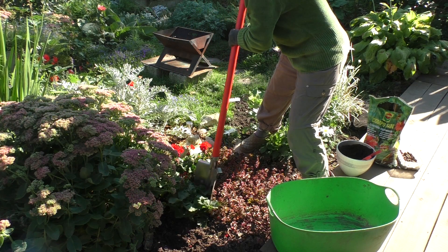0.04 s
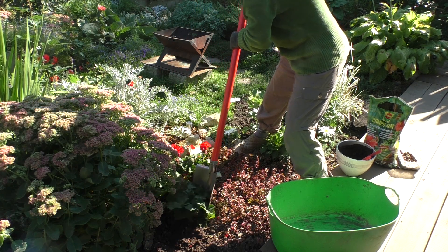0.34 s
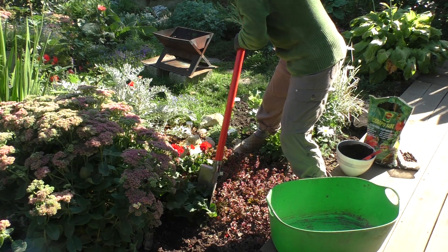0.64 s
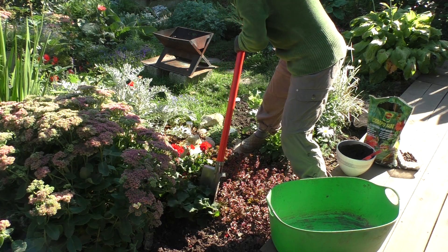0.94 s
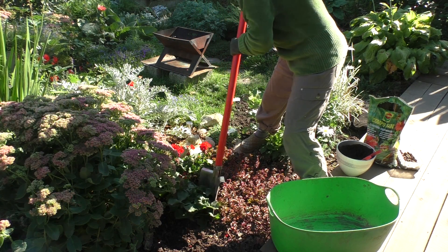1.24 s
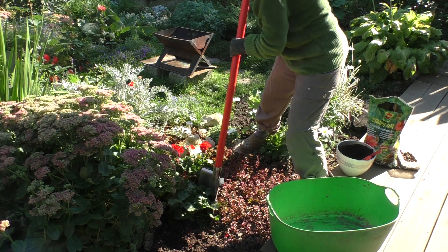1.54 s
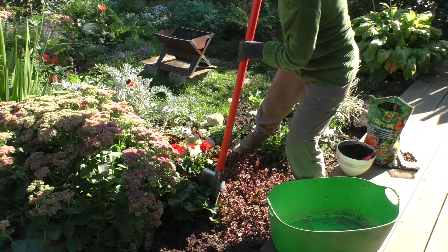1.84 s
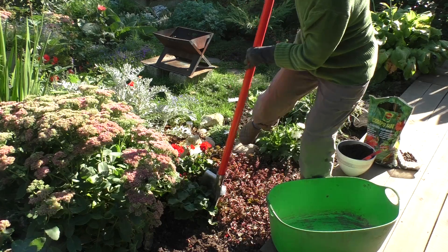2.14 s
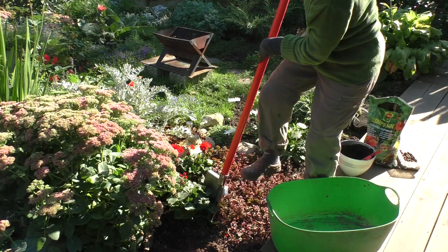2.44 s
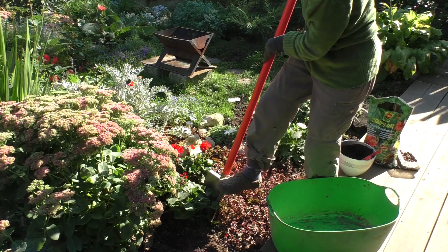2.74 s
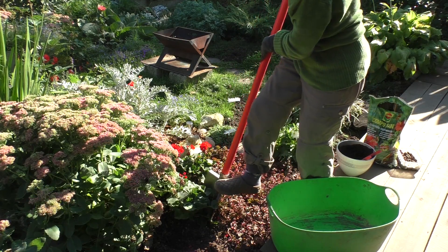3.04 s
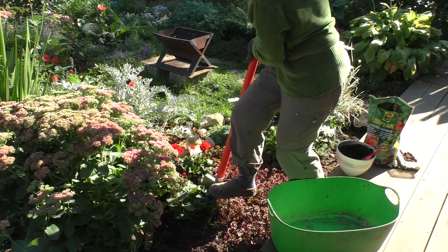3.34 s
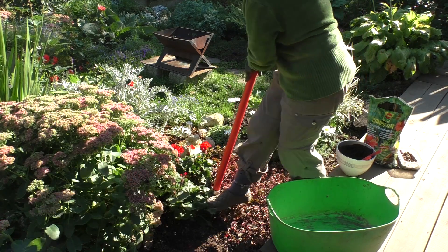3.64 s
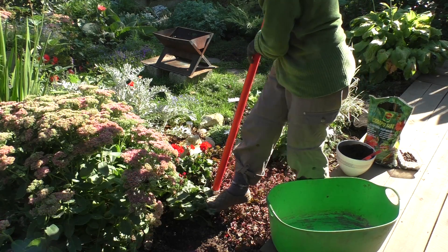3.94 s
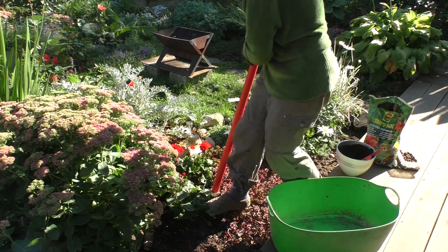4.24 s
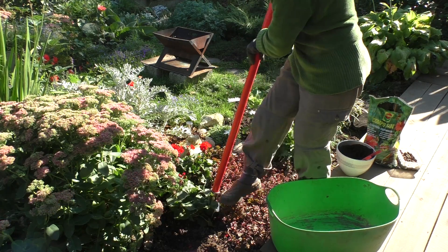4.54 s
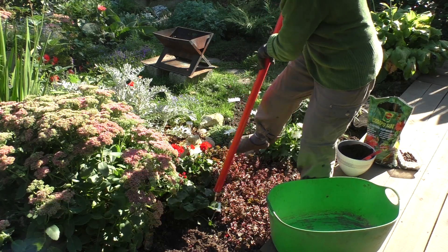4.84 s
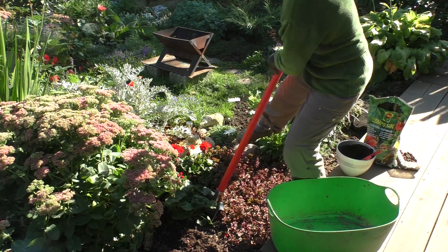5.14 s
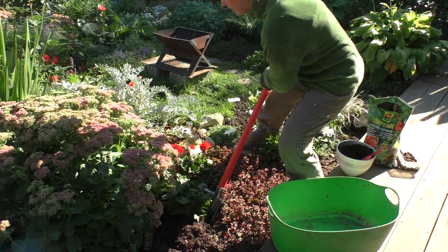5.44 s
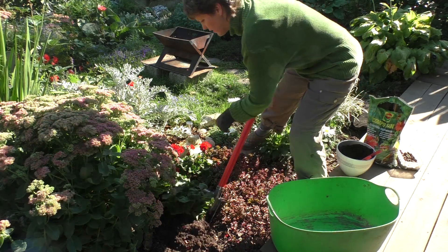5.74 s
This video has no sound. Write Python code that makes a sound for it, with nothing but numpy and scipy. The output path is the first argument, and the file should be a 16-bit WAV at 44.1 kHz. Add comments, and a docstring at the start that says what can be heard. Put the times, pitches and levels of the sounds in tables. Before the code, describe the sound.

In a garden, close to the microphone, leaves brush softly and stems snap while a breeze rumbles low. A spade's edge clinks once. A little past halfway the blade is trodden into gritty soil with a short rasp and a cluster of stony knocks. A smaller scrape, another dry clink, dull earthy scuffs and more rustling follow. Faint birds whistle far off in a steady outdoor hiss.

```python
"""A spade is trodden into a garden bed, close to the microphone: the blade rasps through gritty soil,
stones knock on the steel, and twice the bare edge clinks. Around it leaves brush against legs and
shaft, stalks tick, stems snap, clods land and a sole scuffs; deck and house wall answer faintly.
A breeze rumbles in the microphone housing; far birds whistle and twitter in the garden's hiss."""
import sys
import numpy as np
from scipy import signal
from scipy.fft import rfft, irfft, next_fast_len
from scipy.io import wavfile
from scipy.ndimage import uniform_filter1d, map_coordinates

SR = 44100
rng = np.random.default_rng(int(sys.argv[2]) if len(sys.argv) > 2 else 0)


def wav_record(signal):
    """Record a signal, one row per channel, as 16-bit PCM in the file named by sys.argv[1]."""
    frames = np.transpose(np.atleast_2d(signal))
    bounded = np.clip(frames, -1, 1)
    # unit amplitude maps onto the largest positive 16-bit level
    quanta = np.round(bounded * 32767).astype(np.int16)
    wavfile.write(sys.argv[1], SR, quanta)


N = 264600  # 6 s

# open-air hiss all around: (frequency [Hz], relative density [dB])
HISS_SPECTRUM = [(30, 4), (60, 20), (200, -2), (450, -10), (630, -7.5), (720, 2), (850, 2.5), (1150, 2),
                 (1900, -4.5), (2200, -3.5), (2450, 2), (3700, 0), (4300, -5.5), (5100, 1), (5900, -7.5),
                 (10500, -7.5), (12500, -11), (16000, -15.5)]
# far birds, held notes: (start [s], length [s], pitch [Hz], relative level [dB])
BIRD_WHISTLES = [(.02, .23, 3960, -63), (.82, .21, 3900, -63), (.86, .25, 2340, -65),
                 (4.36, 1.05, 3995, -63.5), (4.79, .13, 3985, -60), (5.03, .09, 2990, -62),
                 (5.69, .14, 2960, -54.5), (5.87, .09, 3920, -61)]
# far birds, short glides: (start [s], first pitch [Hz], last pitch [Hz], relative level [dB])
BIRD_CHIRPS = [(.625, 4560, 4360, -61), (.675, 4020, 3700, -62), (1.015, 3780, 4330, -58)]
# far birds, runs of quick notes: (start [s], notes [count], pitch [Hz], relative level [dB])
BIRD_TWITTERS = [(.42, 11, 2700, -63), (4.38, 5, 2950, -66), (5.18, 7, 3100, -65)]
# echo off deck and house wall: (frequency [Hz], t60 [s])
YARD_DECAY = [(300, 0.34), (3000, 0.14), (12000, 0.13)]
# breeze on the microphone, deep rumble: (time [s], level [dB])
WIND_DEEP = [(0, -29), (.28, -34), (.72, -34), (.84, -26), (.95, -27), (1.13, -22), (1.6, -19.5),
             (1.93, -27.5), (2.27, -26.5), (2.35, -22), (2.43, -30.5), (3.15, -31), (3.34, -28.5),
             (3.48, -32), (3.62, -28.5), (4.15, -34.5), (4.55, -34), (4.9, -31), (5.22, -36), (5.38, -31),
             (5.85, -27.5), (6, -30)]
# breeze on the microphone, upper resonances: (time [s], level [dB])
WIND_UPPER = [(0, -33.5), (.2, -39.5), (.5, -38), (.95, -35.5), (1.18, -24.5), (1.5, -25), (1.68, -28.5),
              (1.9, -27), (2.2, -36), (2.48, -40.5), (2.68, -30), (2.95, -33.5), (3.25, -32), (3.75, -35.5),
              (4.02, -36.5), (4.15, -42.5), (4.47, -45.5), (4.65, -41), (5.4, -36), (6, -33.5)]
# hollow resonances of the microphone housing: (frequency [Hz], width [Hz], relative level [dB])
HOUSING_MODES = [(115.2, 33, -5), (146.1, 42.8, 0.5), (181.6, 13, 6.5), (196.5, 11.5, 1.5), (242, 35.5, -5),
                 (290, 29, -2.5), (323.05, 10.2, 2), (342.3, 15.7, -2), (379, 12.2, -12.5),
                 (423.8, 46, -15.5), (474.3, 84, -17.5)]
# leaves rubbing: (frequency [Hz], gain [dB])
LEAF_SPECTRUM = [(500, -13), (900, -4.5), (1900, -1), (2700, 4.5), (3600, 5.5), (4300, 1.5), (5200, 6.5),
                 (6200, 2), (9000, -2), (11500, -7), (16000, -28)]
# soft rustle of the stirred plants: (time [s], relative level [dB])
RUSTLE_LEVEL = [(0, -62), (.25, -52), (.85, -59), (1.45, -64), (1.75, -54), (2.15, -60.5), (2.38, -52),
                (3.05, -58.5), (3.351, -51.5), (3.9, -61), (5.0, -59), (5.4, -53), (6.0, -54)]
# foliage brushing past: (time [s], relative level [dB], half length [s], tilt [dB/octave])
LEAF_SWISHES = [(0.254, -42, 0.013, -2), (0.318, -47.5, 0.016, 1), (0.805, -51, 0.016, 3),
                (0.845, -49.5, 0.037, -0.5), (1.091, -46, 0.012, -2.5), (1.242, -49.5, 0.03, 4),
                (1.309, -43.5, 0.02, 6), (1.642, -48.5, 0.023, -3), (1.99, -47.5, 0.037, 1.5),
                (2.469, -51, 0.041, -7.5), (4.215, -48.5, 0.01, 13), (5.231, -51, 0.022, -1),
                (5.673, -46.5, 0.095, 9.5)]
# a dry stalk's tick: (frequency [Hz], gain [dB])
STALK_SPECTRUM = [(1000, -24), (2200, -7), (3400, 11), (5300, 4), (7000, -25), (14000, -37)]
# a leg swings through dry stalks: (time [s], peak [dB])
STALK_TICKS = [(1.651, -51), (2.4267, -36), (2.449, -34), (2.452, -33), (2.4604, -39), (2.476, -34.5),
               (2.491, -40)]
# a stem's crack: (frequency [Hz], gain [dB])
STEM_SPECTRUM = [(500, -12), (1000, -5), (2000, -1), (3000, -4), (4200, -5), (4950, -4), (5900, -2.5),
                 (7100, 0), (9000, -4), (11500, -2), (16000, -12)]
# stems snapping: (time [s], relative peak [dB], pitch [Hz])
STEM_SNAPS = [(0.1235, -36.5, 5770), (.202, -32, 11100), (1.2295, -37, 7000), (1.3154, -35, 6400),
              (1.8397, -24.5, 11200), (2.7523, -37, 6940), (3.6268, -34, 5900)]
# a dull earthy tick or scuff: (frequency [Hz], gain [dB])
EARTH_SPECTRUM = [(400, 3), (650, -9), (800, -2.5), (1150, 2.5), (1600, -6), (3000, -10), (6000, -33),
                  (14000, -25)]
# clods landing, a sole shifting on the soil: (time [s], relative peak [dB], t60 [s])
EARTH_TICKS_AND_SCUFFS = [(0.341, -49, .04), (1.086, -44, 0.088), (2.495, -44, .07), (3.397, -23, 0.0083),
                          (3.682, -43.5, 0.19), (3.77, -44, 0.11), (4.244, -37, 0.053), (4.256, -36, 0.085),
                          (5.447, -38.5, 0.088), (5.535, -36, 0.06), (5.884, -40, 0.041)]
# grit against steel: (frequency [Hz], gain [dB])
GRIT_SPECTRUM = [(400, -12), (650, -32), (800, 3.5), (1400, -8.5), (2100, 0), (2650, 3.5), (4100, 1.5),
                 (5100, 2), (8000, 4.5), (10300, 0.5), (11300, -5), (12500, -6), (16000, -6)]
# the blade's bare edge: (frequency [Hz], width [Hz], relative level [dB])
EDGE_MODES = [(3200, 240, -27), (4280, 380, -17), (4900, 160, -5.5), (5370, 110, -14), (6940, 260, 0),
              (7800, 300, -22), (8820, 450, -2), (10200, 460, -14), (10730, 320, -8), (12400, 400, -14)]
# the edge meets a stone as the spade is levered:
# (time [s], peak [dB], favoured frequency [Hz], rebound gain [dB], crack tilt [dB/octave])
EDGE_CLINKS = [(1.29, -28, 4800, 2.5, -1.5), (5.0156, -22, 7100, -2, 4.5)]
# the steel blade, damped by earth: (frequency [Hz], width [Hz], relative level [dB])
BLADE_MODES = [(874, 62, -10), (1680, 200, -20), (2854, 180, 3.5), (3700, 150, -1), (4750, 340, -1),
               (5500, 310, 0), (6680, 440, -6.5), (8600, 390, -17), (9350, 400, -2), (10950, 470, 3.5),
               (14200, 350, -18)]
# stones meeting the buried blade: (time [s], peak [dB], favoured frequency [Hz])
STONE_KNOCKS = [(3.3682, -33.5, 3460), (3.4035, -28.5, 3020), (3.417, -30, 2850), (3.4353, -35, 5000),
                (3.4417, -29, 4800), (3.4555, -33, 3600), (3.48, -38, 2800), (3.4864, -24.5, 5840),
                (3.4895, -27.5, 2800), (3.4967, -29, 9300), (3.5135, -32, 2870), (3.5297, -29, 3650),
                (3.5308, -16.5, 2830), (3.545, -29, 4750), (3.5493, -22.5, 7500), (3.5559, -27, 3020),
                (4.2295, -31.5, 6500), (4.24, -48, 5000), (4.2585, -51, 3000)]
# wet stalks squeaking on the steel: (time [s], half length [s], pitch [Hz], level [dB])
STALK_SQUEAKS = [(3.385, 0.0055, 5450, -35.5)]
# shoves that tread the blade into the soil: (start [s], length [s], level [dB])
BLADE_SHOVES = [(3.374, 0.17, -35), (3.43, 0.063, -44.5), (3.462, 0.012, -44), (4.219, 0.059, -46)]


def amp(db):
    """Decibels to gain."""
    return 10 ** (np.asarray(db) / 20)


def unit(x):
    """Scale to rms 1."""
    return x / np.sqrt(np.mean(x ** 2) + 1e-20)


def even(x, span_s=.14):
    """Keep the quick flutter but hold the strength over longer spans, at rms 1."""
    power = np.abs(uniform_filter1d(x * x, int(span_s * SR)))
    return unit(x / np.sqrt(power + 1e-12))


def peaked(x, db):
    """Scale a hit so that its loudest millisecond is at db."""
    return amp(db) * x / np.sqrt(uniform_filter1d(x * x, SR // 1000).max())


def clock(size=N):
    """Seconds, sample by sample."""
    return np.arange(size) / SR


def add(track, s, sound):
    """Mix a sound in at s seconds."""
    part = track[max(round(s * SR), 0):][:len(sound)]
    part += sound[:len(part)]


def along(points, hz):
    """Read (frequency [Hz], value) points on a log axis."""
    f, v = np.transpose(points)
    return np.interp(np.log(hz + 1), np.log(f + 1), v)


def bell(x, centre, half):
    """A bell-shaped rise and fall around a centre."""
    return np.exp(-.5 * ((x - centre) / half) ** 2)


def wobble(rate):
    """A smooth random curve, rate knots a second."""
    return map_coordinates(rng.standard_normal(int(N * rate / SR) + 4), [clock() * rate])


def filtered(x, response):
    """Filter x by a complex response of frequency."""
    m = next_fast_len(len(x) + SR // 8)
    return irfft(rfft(x, m) * response(np.fft.rfftfreq(m, 1 / SR)), m)[:len(x)]


def coloured(x, spectrum, tilt_db=0):
    """Shape x by a spectrum and a tilt per octave, rolled off below the first point, at rms 1."""
    def response(hz):
        lowest = spectrum[0][0]
        db = along(spectrum, hz) + tilt_db * np.log2(np.maximum(hz, lowest))
        return amp(db) * np.minimum(hz / lowest, 1) ** 4
    return unit(filtered(x, response))


def resonate(x, modes):
    """Pass x through damped resonances (frequency [Hz], width [Hz], level [dB]), at rms 1."""
    def response(f):
        return sum(amp(db) * 1j * f * width / (hz * hz - f * f + 1j * f * width)
                   for hz, width, db in modes)
    return unit(filtered(x, response))


def burst(t60):
    """A tenth of a second of noise that starts at once and dies away."""
    t = clock(SR // 10)
    return rng.standard_normal(len(t)) * amp(-60 * t / t60)


def grains(size, rate, spread_db):
    """Tiny impacts at random moments, a few larger than the rest, at rms 1."""
    sizes = amp(spread_db * np.minimum(rng.exponential(size=size), 4))
    return unit((rng.random(size) < rate / SR) * sizes * rng.standard_normal(size))


def pings(size, rate, spectrum, cycles, spread_db):
    """Grains that each ring briefly at a pitch of their own, at rms 1."""
    count = int(rate * size / SR) + 1
    when, pitch, chance, phase = rng.random((count, 4)).T[:, :, None]
    hz = 900 + 14500 * pitch
    t = clock(size=128)
    sizes = amp(-spread_db * np.log(.02 + chance)) * np.sqrt(hz)
    waves = sizes * np.exp(-t * hz / cycles) * np.sin(2 * np.pi * (hz * t + phase))
    places = (when * size).astype(int) + np.arange(len(t))
    return coloured(np.bincount(places.ravel(), waves.ravel(), size)[:size], spectrum)


def garden_hiss(level_db=-54):
    """The even hiss of the open air all around, drifting slightly."""
    drift = amp(.3 * wobble(3))
    return amp(level_db) * drift * coloured(rng.standard_normal(N), HISS_SPECTRUM)


def far_birds(waver_hz=48, sag_hz=34.8, chirp_s=.075, note_s=.036, spread_hz=280):
    """Sinking whistles, chirps and twitters, blurred by echoes on their long way to the microphone."""
    song = np.zeros(N)
    waver = waver_hz * wobble(400)
    held = [(s, length, hz, hz - sag_hz, db) for s, length, hz, db in BIRD_WHISTLES]
    glides = [(s, chirp_s, first, last, db) for s, first, last, db in BIRD_CHIRPS]
    quick = [(s + k * note_s, note_s, *(hz + spread_hz * rng.uniform(-1.1, 1, 2)), db)
             for s, notes, hz, db in BIRD_TWITTERS for k in range(notes)]
    for s, length, first, last, db in held + glides + quick:
        n = int(length * SR)
        phase = 2 * np.pi * np.cumsum(np.linspace(first, last, n) + waver[:n]) / SR
        add(song, s, amp(db) * unit(np.sin(phase) * signal.windows.tukey(n, .5)))
    tail = burst(t60=.15)
    echoes = signal.fftconvolve(song, tail / np.linalg.norm(tail))[:N]
    fading = amp(1.2 * wobble(22))
    return .55 * fading * (song + echoes)


def yard_echo(x):
    """Deck and house wall give a short answer whose treble dies first."""
    hz, t, noise = signal.stft(rng.standard_normal(SR // 4), SR, nperseg=256)
    decay = amp(-60 * t / along(YARD_DECAY, hz)[:, None])
    tail = signal.istft(noise * decay, SR, nperseg=256)[1]
    return signal.fftconvolve(x, tail / np.linalg.norm(tail))[:N]


def wind_on_microphone(bottom_hz=95, split_hz=245, top_hz=505):
    """Turbulence drones in the housing; the deep and the upper resonances swell separately."""
    hollow = np.zeros(N)
    for hz, width, db in HOUSING_MODES:
        band = resonate(rng.standard_normal(N), [(hz, width, 0)])
        steeper = resonate(band, [(hz, 2 * width, 0)])
        hollow += amp(db) * np.sqrt(width) * even(steeper)
    drone = filtered(hollow, lambda hz: 1 / (1 + (hz / top_hz) ** 14) / (1 + (bottom_hz / (hz + 1)) ** 4))
    deep = filtered(drone, lambda hz: 1 / (1 + (hz / split_hz) ** 16))
    deep_db = np.interp(clock(), *np.transpose(WIND_DEEP))
    upper_db = np.interp(clock(), *np.transpose(WIND_UPPER))
    return amp(deep_db) * unit(deep) + amp(upper_db) * unit(drone - deep)


def leaves(size, tilt_db, crackle_db=-2):
    """Leaves rubbing: dense little scratches with sparser crackles on top, at rms 1."""
    rub = coloured(grains(size, rate=9000, spread_db=2), LEAF_SPECTRUM, tilt_db)
    crackle = pings(size, rate=950, spectrum=LEAF_SPECTRUM, cycles=52, spread_db=3)
    return unit(rub + amp(crackle_db) * crackle)


def foliage(gain_db=-1, flutter_db=.57, restless_db=1.94):
    """The plants around the spade rustle softly; each brush against them is one swell."""
    rustle_db = np.interp(clock(), *np.transpose(RUSTLE_LEVEL)) - restless_db * wobble(16)
    out = amp(rustle_db) * leaves(N, tilt_db=.5)
    for s, db, half, tilt_db in LEAF_SWISHES:
        start = max(s - 2.5 * half, 0)
        t = start + clock(int(5 * half * SR))
        add(out, start, amp(db) * bell(t, s, half) * leaves(len(t), tilt_db))
    return out * amp(gain_db + flutter_db * wobble(90))


def stalk_ticks():
    """Dry stalks tick as they are bent aside."""
    out = np.zeros(N)
    for s, db in STALK_TICKS:
        add(out, s, peaked(coloured(burst(t60=.003), STALK_SPECTRUM), db))
    return out


def stem_snaps(gain_db=-6, ring_db=-4, width_hz=1900):
    """A stem tears in a few milliseconds and rings; the higher its pitch, the brighter its crack."""
    out = np.zeros(N)
    for s, db, hz in STEM_SNAPS:
        crack = coloured(burst(t60=.018), STEM_SPECTRUM, tilt_db=3 * np.log2(hz / 6000))
        ring = amp(ring_db) * resonate(crack, [(hz, width_hz, 0)])
        add(out, s, peaked(crack + ring, db + gain_db))
    return out


def loose_earth(gain_db=-7):
    """Dull earthy ticks and scuffs: clods landing, a sole shifting on the soil."""
    out = np.zeros(N)
    for s, db, t60 in EARTH_TICKS_AND_SCUFFS:
        add(out, s, peaked(coloured(burst(t60), EARTH_SPECTRUM), db + gain_db))
    return out


def strike(modes, focus_hz, focus_db, contact_s, crack_db, tilt_db):
    """Steel on stone: modes are driven while the stone grinds, then die; the contact point favours some."""
    t = clock(SR // 10)
    since_release = np.maximum(t - contact_s, 0)
    ring = np.zeros(len(t))
    for hz, width, db in modes:
        level = db + focus_db * bell(np.log2(hz), np.log2(focus_hz), .2) + rng.normal(0, 1)
        phase = rng.uniform(0, 2 * np.pi) + np.cumsum(rng.normal(0, .06, len(t)))
        ring += amp(level) * np.exp(-np.pi * width * since_release) * np.sin(2 * np.pi * hz * t + phase)
    crack = coloured(burst(t60=.017), GRIT_SPECTRUM, tilt_db)
    attack = 1 - np.exp(-(t / .0002) ** 2)
    return attack * (peaked(ring, 0) + peaked(crack, crack_db))


def edge_clinks(rebound_s=.002):
    """The bare edge hits a stone and rebounds: two hits heard as one dry tick."""
    out = np.zeros(N)
    for s, db, hz, rebound_db, tilt_db in EDGE_CLINKS:
        for delay, level in ((0, db), (rebound_s, db + rebound_db)):
            hit = strike(EDGE_MODES, hz, focus_db=4, contact_s=.0007, crack_db=-5, tilt_db=tilt_db)
            add(out, s + delay, peaked(hit, level))
    return out


def stone_knocks():
    """Stones knock on the buried blade."""
    out = np.zeros(N)
    for s, db, hz in STONE_KNOCKS:
        hit = strike(BLADE_MODES, hz, focus_db=9.5, contact_s=.0016, crack_db=-3.5, tilt_db=.5)
        add(out, s, peaked(hit, db))
    return out


def spade_in_soil(ring_db=-5.5, contact_hz=11800, bite_s=.018, stop_s=.015):
    """Close up, grit rasps along the blade in small slips, and wet stalks squeak against it."""
    steel = resonate(grains(N, rate=3500, spread_db=2.1), BLADE_MODES)
    # a film of earth softens every contact with the steel
    steel = filtered(steel, lambda hz: 1 / (1 + (hz / contact_hz) ** 8))
    grit = pings(N, rate=9000, spectrum=GRIT_SPECTRUM, cycles=7.6, spread_db=2)
    rasp = unit(grit + amp(ring_db) * unit(steel))
    t = clock()
    force = np.zeros(N)
    for s, length, db in BLADE_SHOVES:
        speeding_up = np.clip((t - s) / bite_s, 0, 1)
        stopping = np.exp(-np.maximum(t - s - length, 0) / stop_s)
        force += amp(db) * speeding_up * stopping
    judder = amp(1.1 * wobble(140))
    out = judder * force * rasp
    for s, half, hz, db in STALK_SQUEAKS:
        out += amp(db) * bell(t, s, half) * unit(np.sin(2 * np.pi * hz * t + wobble(500)))
    return out


def scene():
    """One microphone by the bed: the work near, a weak echo behind it, breeze and garden around."""
    work = spade_in_soil() + stone_knocks() + stem_snaps() + stalk_ticks() + loose_earth() + foliage()
    edge = edge_clinks()
    echo = yard_echo(amp(-9) * work + amp(-13) * edge)
    return (work + edge + echo + wind_on_microphone() + garden_hiss() + far_birds())[None]


def record(dry):
    """The microphone chain passes nothing above its band limit."""
    top_hz = 15780
    return np.array([filtered(channel, lambda hz: hz < top_hz) for channel in dry])


dry = scene()
out = record(dry)
wav_record(out)
```